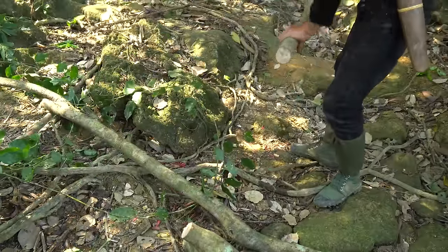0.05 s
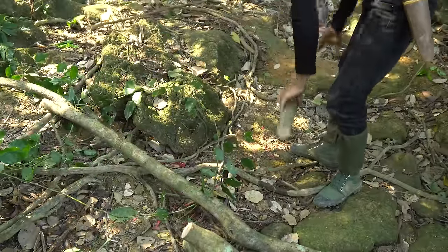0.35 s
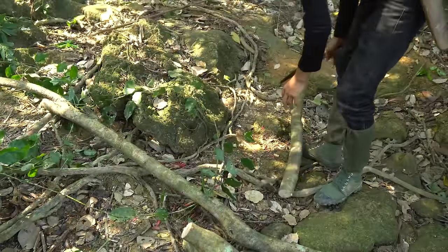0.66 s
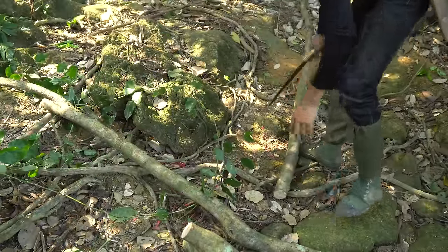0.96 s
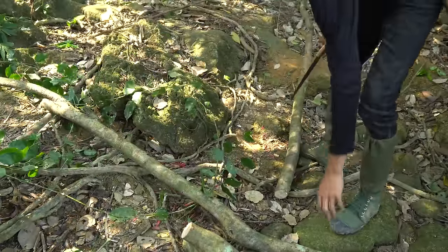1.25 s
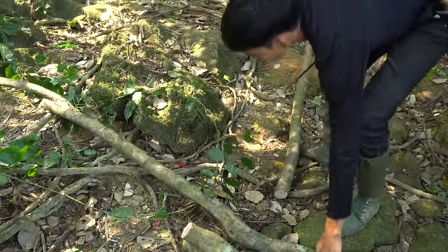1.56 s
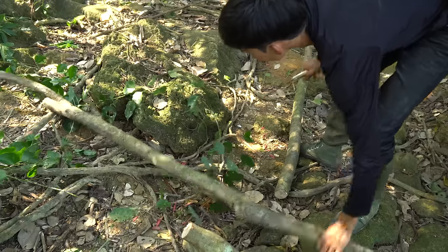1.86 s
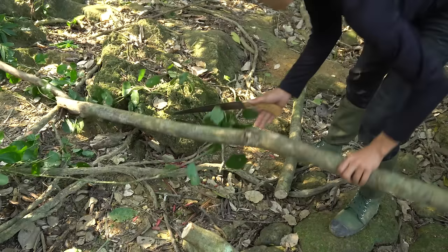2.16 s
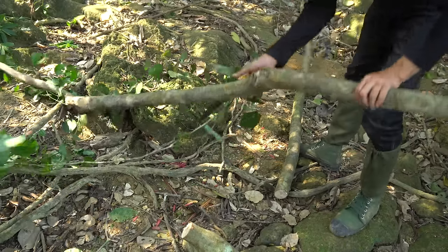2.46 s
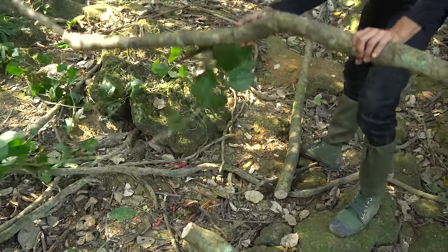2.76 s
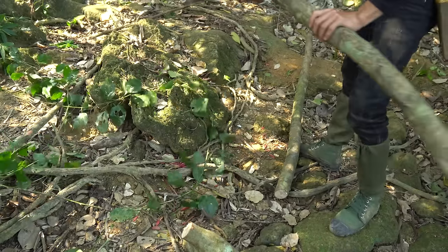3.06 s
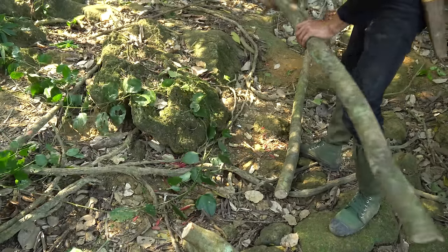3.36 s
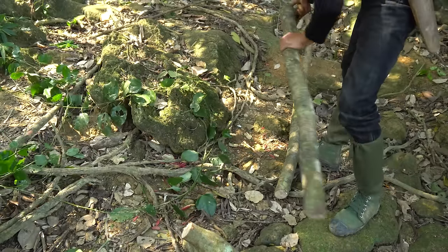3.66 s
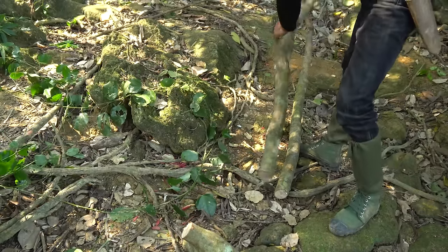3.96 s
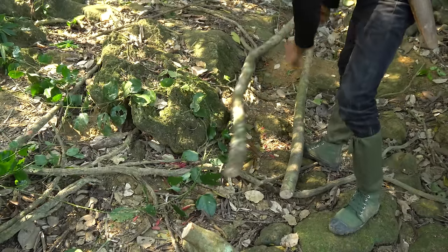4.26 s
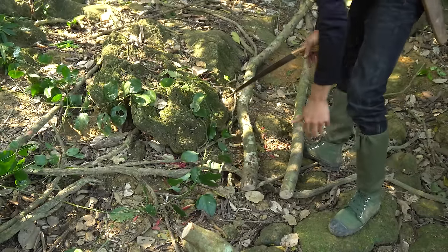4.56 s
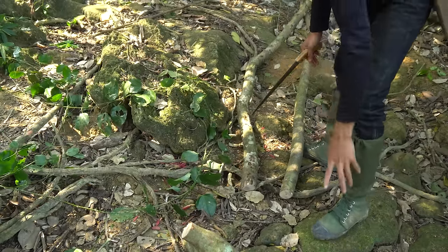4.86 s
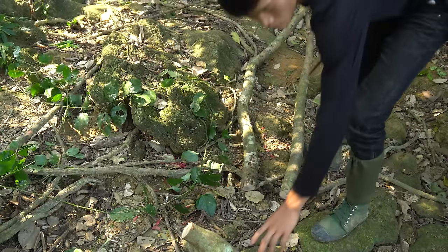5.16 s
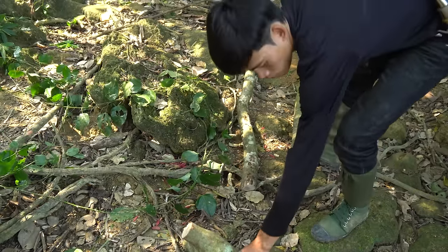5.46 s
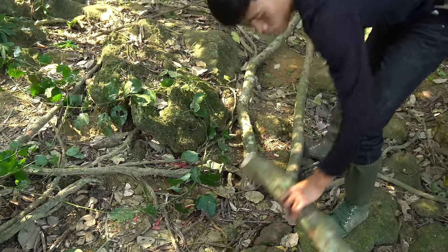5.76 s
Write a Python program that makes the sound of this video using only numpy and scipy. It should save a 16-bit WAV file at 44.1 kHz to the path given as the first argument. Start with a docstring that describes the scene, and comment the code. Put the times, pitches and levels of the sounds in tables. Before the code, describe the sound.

A cut pole drops onto leaf litter with a clack and a heavy thud near the microphone. A small bird gives two thin calls as leaves begin to swish and stems tick and crack around a long pole being pulled free. That pole then clatters to the ground and settles, followed by dull steps on soft soil. Faint, high insects and a soft woodland hush lie underneath.

```python
"""On a forest floor of roots and dry leaves, two freshly cut poles are dropped one after the other.
The short one knocks sharply, then lands heavily; the long one hits the ground and rocks to rest. Impacts
ring their damped bending modes and crush leaves. In between, the long pole is pulled from the
undergrowth: foliage rubs, stems tick and twigs fracture. The trunks scatter a thin reverberation.
Insects sing in narrow bands of noise, and a small bird calls twice in the quiet wood."""
import sys
import numpy as np
from scipy import signal
from scipy.fft import rfft, irfft, next_fast_len
from scipy.io import wavfile
from scipy.ndimage import uniform_filter1d

SR = 44100
rng = np.random.default_rng(int(sys.argv[2]) if len(sys.argv) > 2 else 0)


def wav_record(signal):
    """Record a signal, one row per channel, as 16-bit PCM in the file named by sys.argv[1]."""
    frames = np.transpose(np.atleast_2d(signal))
    bounded = np.clip(frames, -1, 1)
    # unit amplitude maps onto the largest positive 16-bit level
    quanta = np.round(bounded * 32767).astype(np.int16)
    wavfile.write(sys.argv[1], SR, quanta)


N = 264520
TIME = np.arange(N) / SR

# bending modes: f/Hz, relative level/dB, T60/s
SHORT_POLE_MODES = [(106, 4, 0.088), (129, 2, 0.1), (193, -22, 0.19), (247, -23, 0.3), (386, -36, .1),
                    (460, -4.5, 0.15), (537, 0.5, 0.083), (691, -2.5, 0.18), (805, 1.5, 0.11),
                    (880, -27, 0.059), (1030, -15, 0.066), (1234, -5.5, 0.065), (1477, -5, 0.084),
                    (1647, -1, 0.064), (1945, -14, 0.26), (2530, 6, 0.049), (2750, 2.5, 0.086),
                    (3700, 4, 0.055)]
LONG_POLE_MODES = [(96.1, -5, 0.75), (126.4, -8, 0.22), (149.6, -13, 0.31), (188.4, -4, 0.21),
                   (268.3, -16, 0.36), (331.3, -14.5, 0.4), (411, -7, 0.24), (462, -5, 0.13),
                   (541, -9, 0.41), (585, 3, 0.057), (624, 1, 0.12), (690, -2, 0.13), (814, -2.5, 0.11),
                   (990, -28, 0.037), (1044, -8, .09), (1180, -8.5, 0.16), (1630, -9, 0.15),
                   (1850, -14, 0.27), (2050, -8, 0.15), (2510, -4, 0.08), (2690, -18, 0.04),
                   (3240, -18, .06)]
# spectra of the bark's clack and the soil's thud: f/Hz, relative level/dB
CLACK_SPECTRUM = [(40, -50), (150, -2.5), (320, -8), (600, -8), (1100, -1.5), (1400, -9), (2700, -0.5),
                  (5000, -17), (8000, 2), (16000, -44)]
THUD_SPECTRUM = [(30, -16), (70, -15), (110, 5.5), (200, 4), (330, -1), (550, -52), (1500, -60)]


def pole(blows, modes, bark_db, scatter_db, heavy_hz, pan_db, give_s, soil_db, soil_decay_s):
    """Modal superposition: each blow rings the bending modes; crushed bark clacks, the soil thuds."""
    out, t = np.zeros((2, N)), TIME[:SR // 2]
    hz, mode_db, t60 = np.transpose(modes)
    # soft ground gives way, so each mode takes part of a cycle to build up
    build_up = 1 - np.exp(-t / (give_s + .5 / hz[:, None]))
    envelopes = from_db(mode_db[:, None] - 60 * t / t60[:, None]) * build_up
    bark = texture(CLACK_SPECTRUM, NEAR_COHERENCE, grain_db=-1.0)
    soil = texture(THUD_SPECTRUM, NEAR_COHERENCE, grain_db=5.5)
    for k, (s, ring_db, weight_db, clack_s, contact_hz) in enumerate(blows):
        # the pole's weight drives the lowest modes; a soft contact misses the high ones
        contact = from_db(ring_db) / np.hypot(1, (hz / contact_hz) ** 2)
        drive = np.where(hz < heavy_hz, from_db(weight_db), contact)
        # the point of contact sets each mode's strength and phase, drawn here at random
        drive = drive * from_db(scatter_db * rng.standard_normal(len(hz)))
        phases = 2 * np.pi * (hz[:, None] * t + rng.random((len(hz), 1)))
        ring = 0.78 * drive @ (envelopes * np.sin(phases))
        part = k * (N - len(t)) // len(blows) + np.arange(len(t))
        clack = rms_one(low_pass(bark[:, part], contact_hz))
        clack = clack * np.exp(-t / clack_s) * (1 - np.exp(-t / give_s))
        clack_db = ring_db + bark_db + 3.5 * np.log2(contact_hz / 1000)   # hard contacts clack more
        thud = soil[:, part] * t / soil_decay_s * np.exp(1 - t / soil_decay_s)
        add(out, s, ring + from_db(clack_db) * clack + from_db(weight_db + soil_db) * thud)
    return out * from_db([[pan_db / 2], [-pan_db / 2]])


# the short pole gives a sharp wooden knock with almost no thud, then lands heavily and rebounds:
# t/s, level/dB, weight level/dB, contact cut-off/Hz, loss per rebound/dB
SHORT_POLE_HITS = [(.184, -24.5, -49, 1600, 24), (.599, -18.5, -15.5, 2060, 11)]
# the long pole hits the ground: same columns
LONG_POLE_LANDINGS = [(4.086, -17.5, -37, 1230, 10.5), (4.149, -19.5, -34, 1010, 16),
                      (4.392, -22.5, -17.5, 1270, 7.3)]


def hit_blows(hits, lead_s=.0048, rebound_s=.031, clack_s=0.0068, chatter_s=0.043):
    """Inelastic impact: a light, hard touch of bark, the main blow, then two ever softer rebounds."""
    blows = []
    for s, db, weight_db, hz, loss_db in hits:
        blows.append((s - lead_s, db - 6, weight_db - 20, clack_s, hz * 3.1))
        blows.append((s, db, weight_db, clack_s, hz))
        blows += [(s + k * rebound_s, db - k * loss_db, weight_db - k * 8.5, chatter_s, hz * 0.6 ** k)
                  for k in (1, 2)]
    return blows


# a pole rattles, tips, rolls or is gripped: t/s, level/dB, contact cut-off/Hz
SHORT_POLE_KNOCKS = [(.374, -39, 780), (.584, -41, 1200), (.665, -29, 750), (.697, -24.5, 634),
                     (.773, -36.5, 2680), (.808, -35, 497), (.985, -42, 600), (1.103, -46.5, 2520),
                     (1.134, -41.5, 600)]
LONG_POLE_KNOCKS = [(2.195, -53, 1203), (2.26, -51, 700), (3.475, -50, 700), (3.587, -50.5, 1400),
                    (4.1, -19.5, 860), (4.305, -27, 660), (4.33, -35, 497), (4.456, -32, 550),
                    (4.485, -33.5, 690), (4.533, -29.5, 520), (5.905, -40, 800), (5.953, -44.5, 1110)]


def knock_blows(knocks, weight_db, clack_s):
    """Impulsive excitation: a knock is a single blow with little weight behind it."""
    return [(s, db, db + weight_db, clack_s, hz) for s, db, hz in knocks]


# dry leaves crushed or swept aside: t/s, level/dB, decay/s
CRUNCHES = [(.125, -38, 0.043), (0.214, -24, 0.042), (0.437, -31.5, 0.063), (0.628, -30, 0.065),
            (.69, -31.5, 0.1), (0.937, -33, 0.026), (2.235, -41.5, 0.049), (2.788, -33.5, 0.033),
            (3.09, -24, 0.037), (4.147, -22, 0.011), (4.18, -36, 0.057), (4.391, -26.5, 0.011),
            (4.46, -35.5, 0.032), (4.549, -29.5, 0.019)]
# single leaves crack: t/s, level/dB
CRACKS = [(0.073, -35.5), (.108, -33.5), (.422, -28), (2.49, -39.5), (2.725, -41), (2.75, -32.5),
          (2.827, -40), (2.891, -36), (3.042, -28.5), (3.066, -24), (3.247, -38.5), (3.297, -35.5)]
# spectrum of dry litter: f/Hz, relative level/dB
LEAF_SPECTRUM = [(150, -42), (500, -9), (1200, -12), (2000, -5.5), (3000, 1.5), (4500, -2), (6000, -4),
                 (7700, -2.5), (10000, -12), (13000, -8.5), (16000, -16)]


def dry_leaves(blows, crush_hz=2800, crush_swell_s=0.0013, crush_decay_s=0.044):
    """Brittle fracture: leaves crackle in bursts of noise; harder contacts crush them more loudly."""
    bursts = []
    for s, db, _, _, contact_hz in blows:
        crush_db = db + 1 - 20 * np.log10(1 + (crush_hz / contact_hz) ** 2)
        bursts.append((s + crush_swell_s, crush_db, crush_swell_s, crush_decay_s))
    bursts += [(s, db, 0.61 * decay, decay) for s, db, decay in CRUNCHES]
    bursts += [(s, db, .0008, 0.0068) for s, db in CRACKS]
    return swells(bursts) * texture(LEAF_SPECTRUM, NEAR_COHERENCE, grain_db=1.74)


# the long pole is dragged through foliage: t/s, level/dB
PULL = [(1.88, -56), (2.0, -46), (2.22, -45.5), (2.36, -40), (2.59, -45.5), (2.72, -43.5), (2.94, -46.5),
        (3.02, -43.5), (3.32, -46.8), (3.5, -61)]


def pull_level(fade_s=0.24):
    """Amplitude envelope of the dragged foliage, fading exponentially on either side of the pull."""
    s, db = np.transpose(PULL)
    outside_s = np.abs(TIME - np.clip(TIME, s[0], s[-1]))
    return from_db(np.interp(TIME, s, db)) * np.exp(-outside_s / fade_s)


def stem_ticks(count, spread_db, low_hz=2300, high_hz=8300, t60=0.0094):
    """Random impulses: stems tick as they slip past, louder the harder the pull."""
    when, size, pitch = rng.random((count, 3)).T
    times = PULL[0][0] + when * (PULL[-1][0] - PULL[0][0])
    pull_db = 20 * np.log10(np.interp(times, TIME, pull_level()))
    levels = pull_db - 2 + spread_db * (size - .5)
    pitches = low_hz * (high_hz / low_hz) ** pitch
    return [(s, db, hz, t60) for s, db, hz in zip(times, levels, pitches)]


# sleeves and foliage swish with each move: t/s, level/dB, Gaussian width/s
SWISHES = [(.28, -41.5, 0.071), (.5, -49, 0.064), (0.847, -40, 0.13), (1.14, -48.5, 0.077),
           (3.937, -41, 0.053), (4.286, -45.5, 0.12), (4.57, -42, 0.076), (4.995, -58, 0.2)]
# spectrum of green foliage: f/Hz, relative level/dB
FOLIAGE_SPECTRUM = [(150, -15), (550, -3.5), (1100, -5.5), (1600, -9), (2300, -1), (3000, -1.5),
                    (4500, -1.5), (6000, -5), (7700, -3), (10000, -13.5), (12500, -6), (16000, -15)]


def foliage():
    """Friction noise: the pull and the swishes are incoherent, so their powers add."""
    swishes = sum(gaussian(s, db, width_s) for s, db, width_s in SWISHES)
    return np.hypot(pull_level(), swishes) * texture(FOLIAGE_SPECTRUM, FAR_COHERENCE, grain_db=2.5)


def branch_tear(count, start_s=3.066, step_s=.0128, first_hz=3370, last_hz=1370, t60=0.0059):
    """Progressive fracture: the branch tears free in snaps of falling pitch, loudest in the middle."""
    pitches = np.geomspace(first_hz, last_hz, count)
    levels = -18.5 - 9.5 * np.linspace(-1, 1, count) ** 2
    return [(start_s + k * step_s, levels[k], pitches[k], t60) for k in range(count)]


# twigs break: t/s, relative level/dB, f/Hz, T60/s
TWIG_SNAPS = [(.11, -33, 3020, 0.065), (.421, -20, 3140, 0.0072), (.628, -27.5, 7560, .017),
              (1.751, -36, 3020, .021), (2.328, -37.5, 2220, .095), (2.382, -26, 3460, 0.022),
              (2.422, -37.5, 2245, 0.081), (2.782, -36, 2960, .045), (3.293, -37.5, 3640, 0.068),
              (3.884, -44, 1238, 0.16)]


def twigs(snaps, snap_db, snap_decay_s, rise_s):
    """Fracture and free vibration: fibres tear in a broad snap, and the twig rings in one damped mode."""
    out, t = np.zeros((2, N)), TIME[:SR // 8]
    for s, db, hz, t60 in snaps:
        note = np.sin(2 * np.pi * hz * t) * from_db(-60 * t / t60)
        fibres = rng.standard_normal(len(t)) + .5 * rng.standard_normal((2, len(t)))
        snap = band(fibres, hz, 1.2 * hz) * np.exp(-t / snap_decay_s)
        add(out, s, from_db(db + 2) * (note + from_db(snap_db) * snap) * (1 - np.exp(-t / rise_s)))
    return out


# where the leaves and twigs move: t/s, left minus right level/dB
LITTER_PAN = [(0, 0), (1.0, -0.7), (2.2, 3.5), (3.1, 2), (4.1, -.3), (6, 5)]


def pan_litter(litter):
    """Localisation by level difference: the rustling shifts between left and right."""
    return litter * from_db(np.interp(TIME, *np.transpose(LITTER_PAN)) * [[.5], [-.5]])


# boots and wood press into soft soil: t/s, level/dB
THUMPS = [(.24, -40), (.655, -47), (3.11, -42.5), (3.283, -44), (3.89, -41.5), (3.955, -32.5), (3.98, -38),
          (4.184, -30.5), (4.445, -35), (4.805, -45), (5.04, -40), (5.78, -42), (5.925, -34)]
# spectrum of the soil: f/Hz, relative level/dB
SOIL_SPECTRUM = [(25, -17), (50, 0), (90, 6), (140, -3), (220, -17), (400, -50), (1000, -62)]


def ground(swell_s=0.016, thump_decay_s=.028, rock_start_s=4.652, rock_step_s=0.029, rock_decay_s=0.014):
    """Heavy damping: soil thumps without ringing; the long pole rocks to rest on it in four bumps."""
    bumps = [(s, db, swell_s, thump_decay_s) for s, db in THUMPS]
    bumps += [(rock_start_s + k * rock_step_s, -25 - k * 1.4, swell_s, rock_decay_s) for k in range(4)]
    return swells(bumps) * texture(SOIL_SPECTRUM, NEAR_COHERENCE, grain_db=-0.5)


# the microphone is jolted: t/s, level/dB, swell/s, decay/s
JOLTS = [(3.29, -51, 0.0092, .05), (3.94, -48.5, 0.016, 0.042), (4.81, -43, 0.03, 0.049),
         (5.905, -33, 0.012, 0.04), (5.955, -32, 0.033, 0.013)]
# spectrum of a jolt: f/Hz, relative level/dB
RUMBLE_SPECTRUM = [(20, -18), (50, -6), (75, -12), (150, -29), (400, -46)]


def jolts():
    """Structure-borne sound: each jolt of the microphone gives a low rumble."""
    return swells(JOLTS) * texture(RUMBLE_SPECTRUM, NEAR_COHERENCE, grain_db=4.0)


def trunks(x, wet_db, t60, build_s, dull_hz):
    """Multiple scattering: trunks and foliage return a thin, late tail without bass."""
    t = TIME[:SR]
    paths = rng.standard_normal((2, SR)) * from_db(-60 * t / t60) * (1 - np.exp(-(t / build_s) ** 2))
    paths = low_pass(paths / np.linalg.norm(paths[0]), dull_hz)
    paths = signal.sosfilt(signal.butter(1, 700, "high", fs=SR, output="sos"), paths)
    return from_db(wet_db) * signal.fftconvolve(x, paths, axes=1)[:, :N]


# two chirps to each bird call: t/s, level/dB, duration/s, start f/Hz, end f/Hz
CHIRPS = [(1.295, -47.5, 0.029, 5060, 5800), (1.311, -43, 0.049, 5960, 6500),
          (2.011, -46.5, .03, 5230, 5720), (2.023, -43.5, 0.043, 5880, 6400)]


def bird(scatter_s, deviation_hz, waver_hz=130):
    """Frequency modulation: thin, rising calls waver, smeared by their many paths through the trees."""
    out, t = np.zeros((2, N)), TIME[:SR // 3]
    for s, db, length_s, start_hz, end_hz in CHIRPS:
        progress = np.minimum(t / length_s, 1)
        hz = start_hz + (end_hz - start_hz) * progress + deviation_hz * np.sin(2 * np.pi * waver_hz * t)
        call = np.sin(2 * np.pi * np.cumsum(hz) / SR) * np.sin(np.pi * progress)
        paths = rng.standard_normal((2, len(t))) * np.exp(-t / scatter_s)
        heard = np.array([signal.fftconvolve(call, path) for path in paths])
        peak_rms = np.sqrt(uniform_filter1d(heard[0] ** 2, size=2000).max())
        add(out, s, from_db(db) * heard / peak_rms)
    return out


# the insect chorus swells and pauses: t/s, level/dB
CHORUS = [(0, -74), (.7, -51), (1.1, -57), (2.08, -58), (2.16, -67), (2.9, -54.5), (3.4, -57), (6, -58.5)]
# phrases of insects and far birds: t/s, level/dB, Gaussian width/s, f/Hz, resonator bandwidth/Hz
PHRASES = [(1.46, -59, 0.15, 12300, 1188), (1.722, -61, .15, 5200, 300), (1.764, -60, 0.16, 1016, 140.4),
           (5.28, -57, 0.21, 12100, 1300), (5.15, -53.5, 0.11, 4860, 324.1),
           (5.286, -58.5, 0.21, 1003, 131)]


def insects_and_far_birds(flicker_per_s=62, flicker_db=4.5):
    """Amplitude modulation of narrow-band noise: a slow chorus and a few flickering phrases."""
    chorus_gain = from_db(np.interp(TIME, *np.transpose(CHORUS)))
    out = chorus_gain * band(rng.standard_normal((2, N)), hz=9290, width_hz=590)
    for s, db, width_s, hz, width_hz in PHRASES:
        buzz = band(rng.standard_normal((2, N)), hz, width_hz)
        flicker = np.interp(TIME * flicker_per_s, np.arange(2000), rng.standard_normal(2000))
        out += gaussian(s, db, width_s) * buzz * from_db(flicker_db * flicker)
    return out


# spectrum of the quiet wood: f/Hz, relative level/dB
AIR_SPECTRUM = [(15, -36), (25, -7.5), (76, -3), (108, -3), (130, -6.5), (256, -8), (641, -13), (988, -14),
                (1840, -14), (3160, -9.5), (8140, -21), (9320, -19), (10400, -25), (12200, -23),
                (16000, -29.5)]


def still_air(level_db=-47):
    """Stationary ambient noise: the broadband hush of the wood."""
    return from_db(level_db) * texture(AIR_SPECTRUM, FAR_COHERENCE, grain_db=1.0)


# left-right coherence of near and far sound: f/Hz, coherence (used within 0-1)
NEAR_COHERENCE = [(100, 0.96), (600, 1), (1300, 0.79), (2800, 0.91), (5500, 0.35), (14000, 0.52)]
FAR_COHERENCE = [(60, 1), (180, 0.68), (550, 0.1), (1650, 0.47), (4970, 0.32), (15000, -0.14)]


def texture(spectrum, coherence, grain_db):
    """Spectral shaping: partly coherent stereo noise in uneven millisecond grains; rms 1."""
    size = next_fast_len(N)
    hz = np.arange(size // 2 + 1) * SR / size
    mid, side = rfft(rng.standard_normal((2, size))) * from_db(at_hz(spectrum, hz))
    alike = np.clip(at_hz(coherence, hz), 0, 1)
    noise = irfft(np.sqrt(1 + alike) * mid + np.sqrt(1 - alike) * side * [[1], [-1]], size)[:, :N]
    sizes = np.minimum(rng.exponential(1, N // 40 + 1), 5)
    grains = np.interp(np.arange(N), np.linspace(0, N, len(sizes)), sizes)
    return rms_one(noise * from_db(grain_db * grains))


def swells(bursts):
    """Incoherent addition: the envelope of bursts (t/s, level/dB, swell/s, decay/s) summed in power."""
    power = np.zeros(N)
    for s, db, swell, decay in bursts:
        start_s = s - 5 * swell
        t = TIME[max(int(start_s * SR), 0):int((s + 8 * decay) * SR)] - s
        add(power, start_s, (from_db(db) * np.exp(np.minimum(t / swell, -t / decay))) ** 2)
    return np.sqrt(power)


def gaussian(s, db, width_s):
    """Gaussian envelope peaking at time s."""
    return from_db(db) * np.exp(-((TIME - s) / width_s) ** 2 / 2)


def band(x, hz, width_hz):
    """Resonance: two equal resonators in cascade pass one band; rms 1."""
    r = np.exp(-np.pi * width_hz / SR)
    b = np.array([1, 0, -1]) * (1 - r * r) / 2
    a = [1, -2 * r * np.cos(2 * np.pi * hz / SR), r * r]
    return rms_one(signal.lfilter(b, a, signal.lfilter(b, a, x)))


def low_pass(x, hz):
    """Two-pole low-pass."""
    return signal.sosfilt(signal.butter(2, min(hz, .45 * SR), fs=SR, output="sos"), x)


def from_db(db):
    """Level to amplitude ratio."""
    return 10 ** (np.asarray(db) / 20)


def rms_one(x):
    """Normalisation to unit power."""
    return x / np.sqrt(np.mean(x ** 2) + 1e-20)


def at_hz(points, hz):
    """Interpolation on a log-frequency axis."""
    f, value = np.transpose(points)
    return np.interp(np.log(np.maximum(hz, 1)), np.log(f), value)


def add(out, s, sound):
    """Superposition of a sound starting at time s."""
    i = max(round(s * SR), 0)
    out[..., i:i + sound.shape[-1]] += sound[..., :max(N - i, 0)]


def scene():
    """Direct and diffuse sound: poles, litter and soil close by, the wood all round."""
    short_blows = hit_blows(SHORT_POLE_HITS)
    short_blows += knock_blows(SHORT_POLE_KNOCKS, weight_db=-8, clack_s=0.015)
    long_blows = hit_blows(LONG_POLE_LANDINGS)
    long_blows += knock_blows(LONG_POLE_KNOCKS, weight_db=-6, clack_s=0.03)
    short = pole(short_blows, SHORT_POLE_MODES, bark_db=0.0, scatter_db=3.5, heavy_hz=250,
                 pan_db=-1.0, give_s=0.00035, soil_db=-14, soil_decay_s=0.0075)
    long = pole(long_blows, LONG_POLE_MODES, bark_db=1.5, scatter_db=4.5, heavy_hz=140,
                pan_db=-0.8, give_s=0.0014, soil_db=-6, soil_decay_s=0.0062)
    rumble = jolts()
    snaps = TWIG_SNAPS + branch_tear(count=5) + stem_ticks(count=36, spread_db=16)
    litter = dry_leaves(short_blows + long_blows) + foliage()
    litter += twigs(snaps, snap_db=-6, snap_decay_s=0.0045, rise_s=0.000077)
    near = short + long + pan_litter(litter)
    thumps = ground()
    tail = trunks(near, wet_db=-15.5, t60=1.0, build_s=0.0085, dull_hz=6030)
    background = still_air() + insects_and_far_birds() + bird(scatter_s=0.079, deviation_hz=550)
    return near + thumps + rumble + tail + background


def record(dry):
    """Band limiting: a steep elliptic low-pass cuts the treble above 16 kHz."""
    return signal.sosfilt(signal.ellip(12, .1, 80, 16000, fs=SR, output="sos"), dry)


dry = scene()
out = record(dry)
wav_record(out)
```